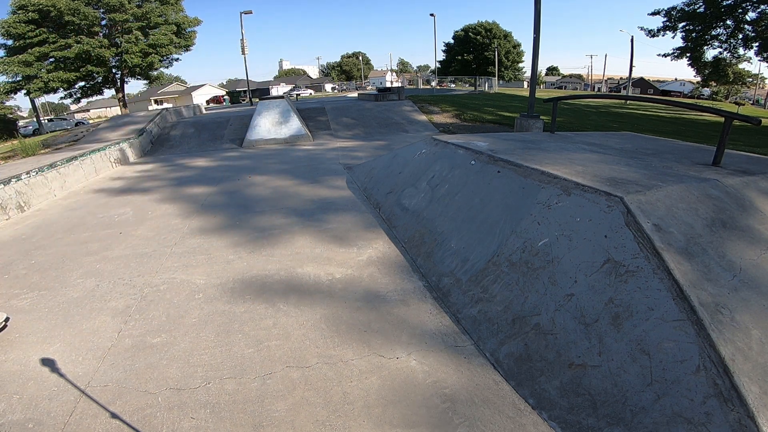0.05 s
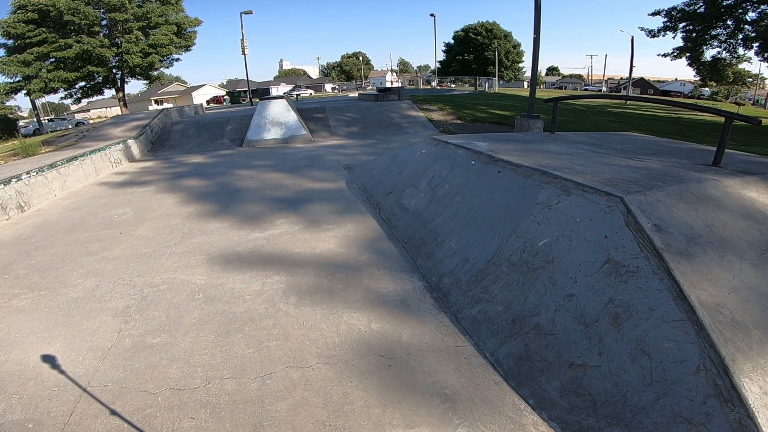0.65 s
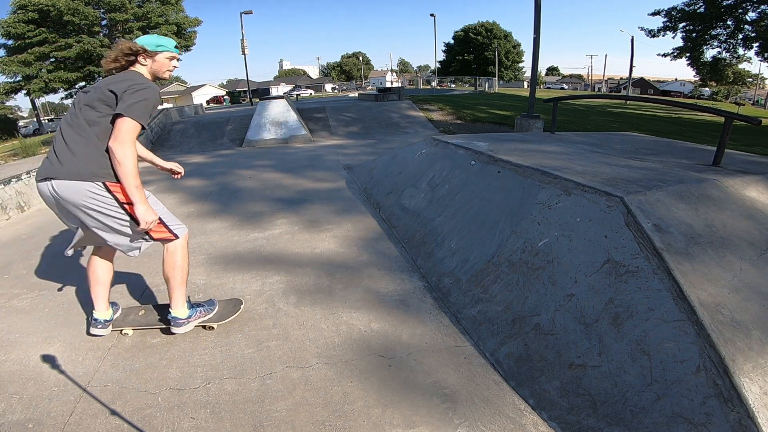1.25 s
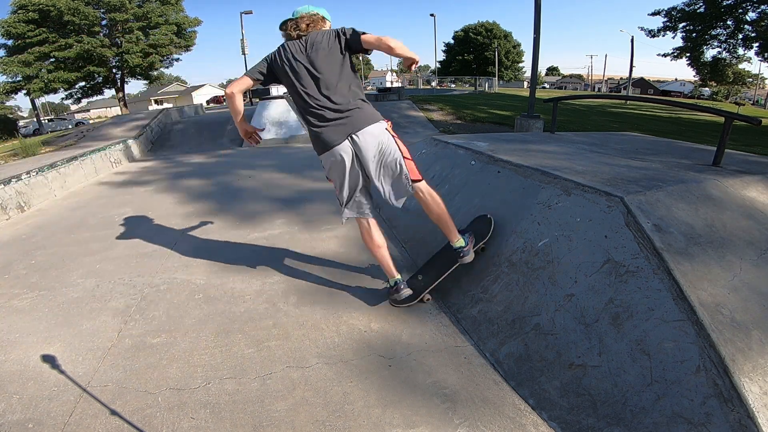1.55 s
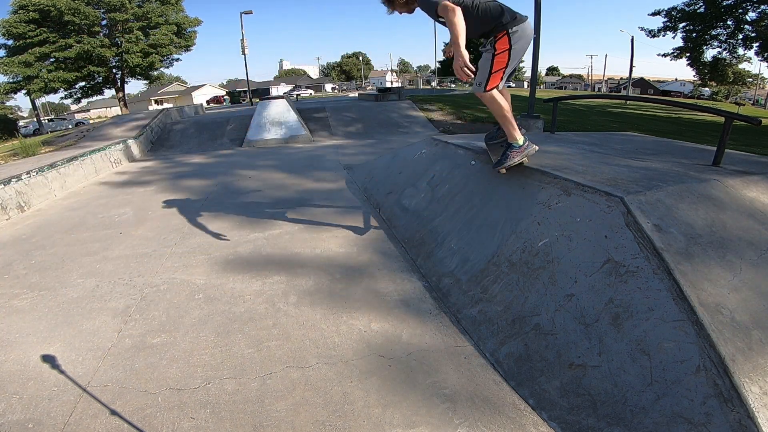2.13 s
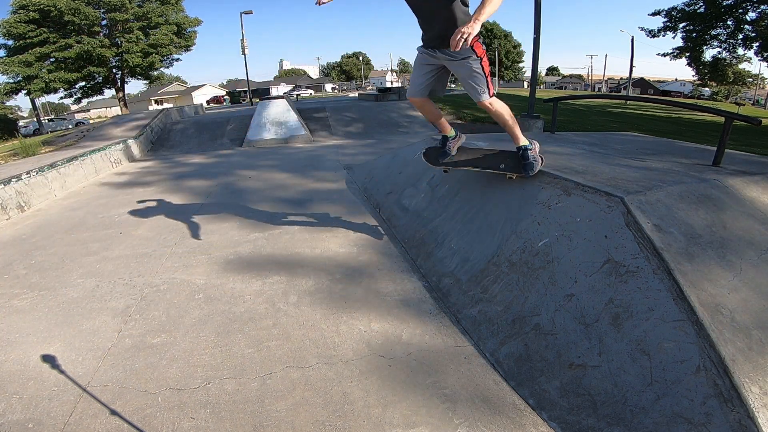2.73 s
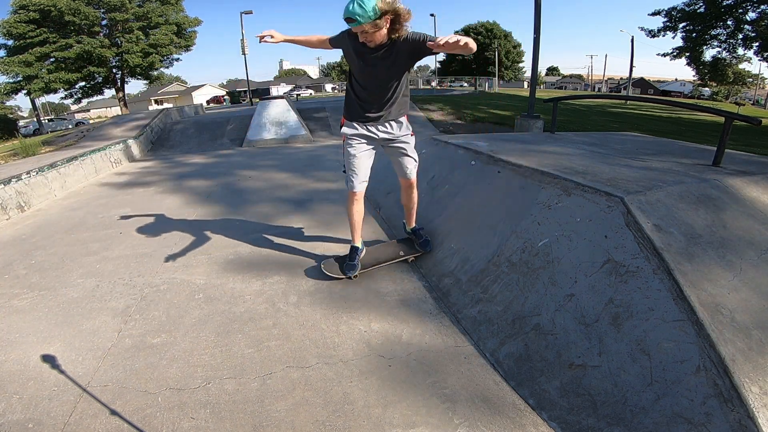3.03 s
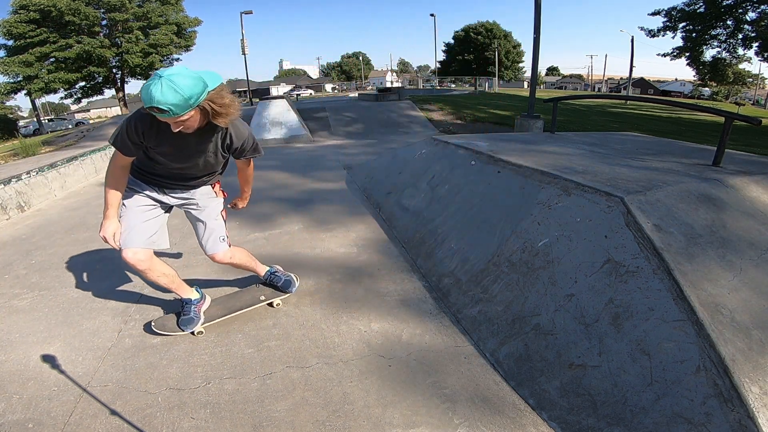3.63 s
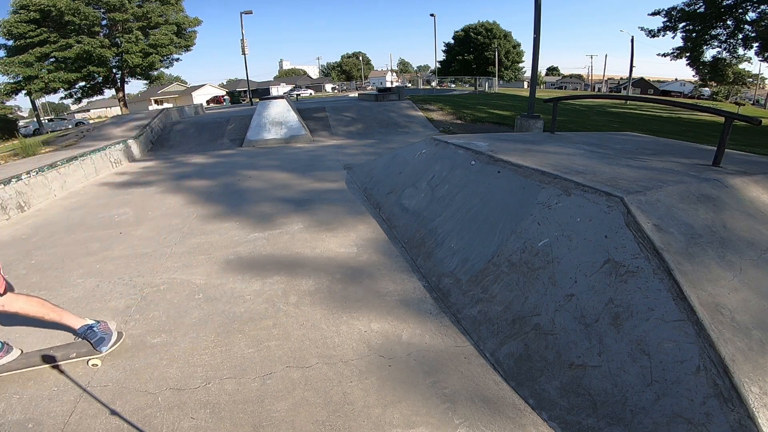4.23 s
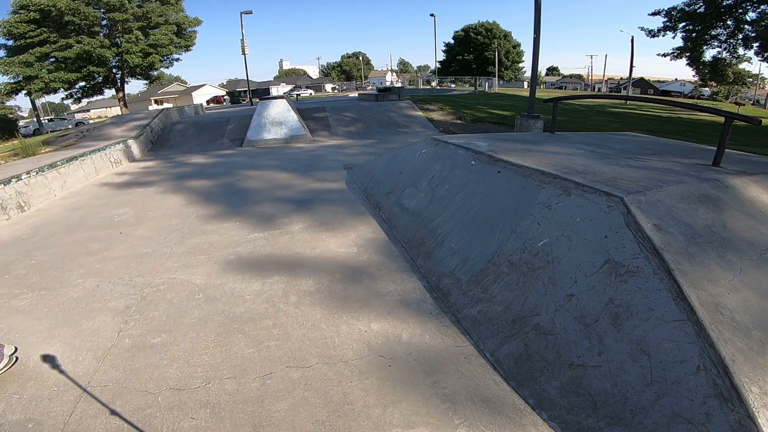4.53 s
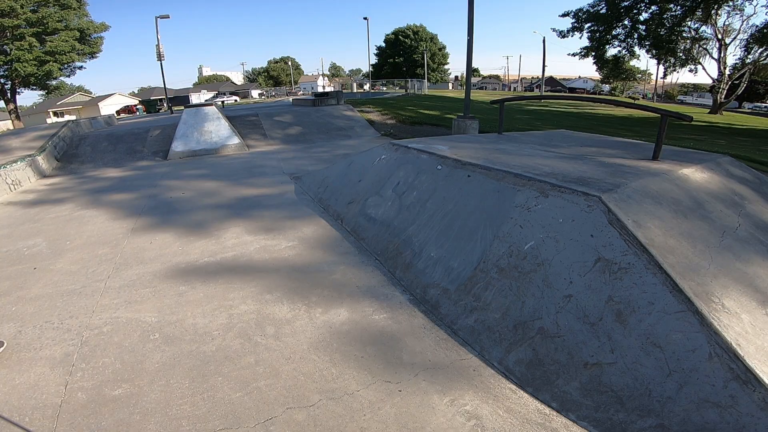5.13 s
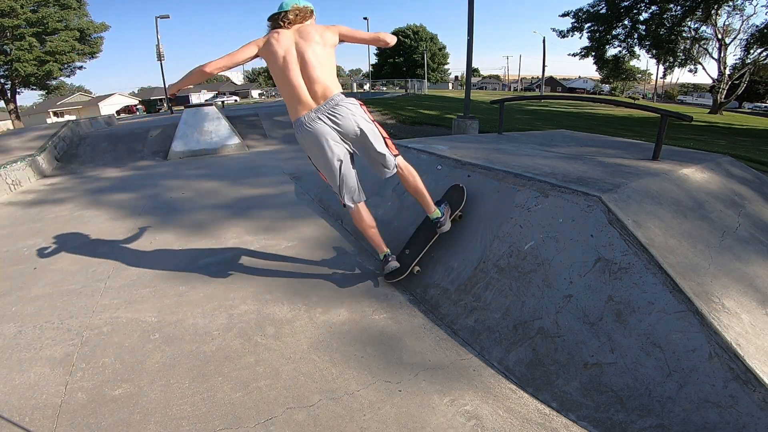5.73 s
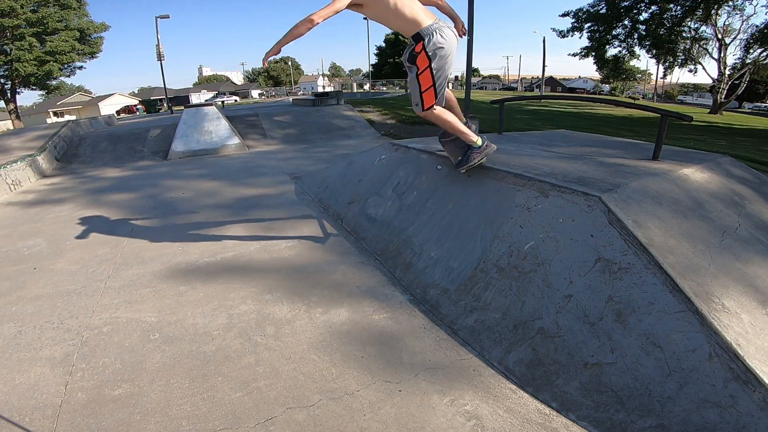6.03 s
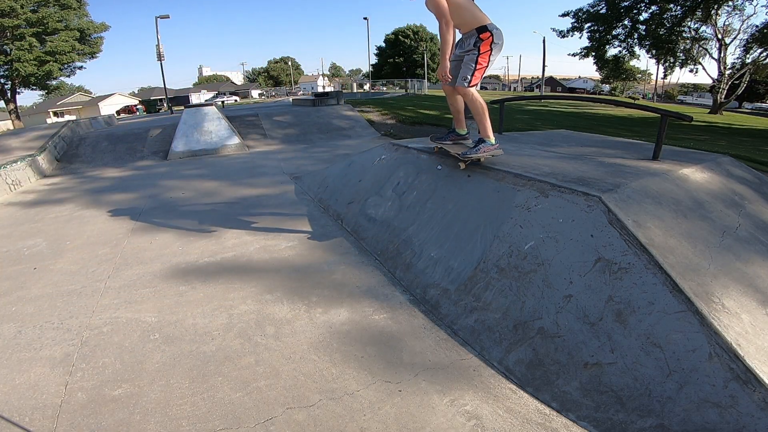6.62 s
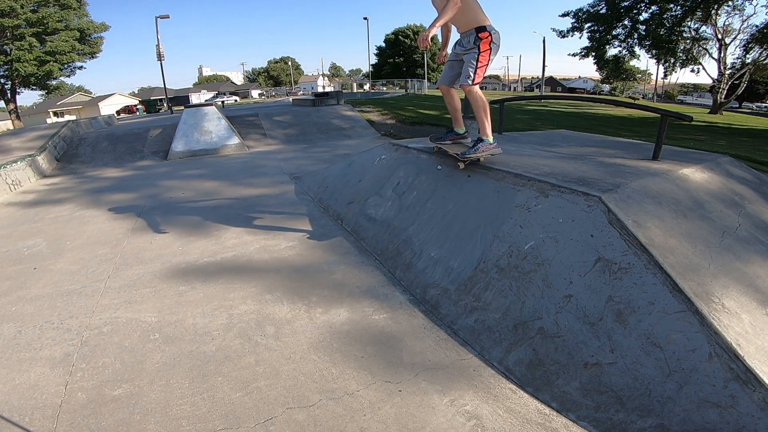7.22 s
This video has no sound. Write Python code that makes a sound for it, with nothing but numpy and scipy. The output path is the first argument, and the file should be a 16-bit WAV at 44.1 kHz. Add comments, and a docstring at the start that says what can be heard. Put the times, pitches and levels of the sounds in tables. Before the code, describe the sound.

A faint puff of wind and a distant hush of town and trees open an outdoor skatepark scene. At 0.4 seconds a skateboard starts rolling close on the left, clattering around 0.7. Its gritty roar grows to loud clacks at 1.6 as it meets a concrete bank. Metal trucks strike the edge at 2 seconds, and the lifted wheels whirr softly until another knock at 2.6. The board comes down with a tiny squeak and sharp clacks near 3.1, then rolls off more quietly to the left. At 5 seconds a short tick comes, low gusts start buffeting the stereo microphone, and a second board rolls in. It cracks loudly against the bank at 5.8, its trucks ring on the edge around 6.2, and the rolling stops by 6.6. The wind keeps rumbling, and a bird chirps once, faintly, at about 7.4 seconds.

```python
"""A puff of wind on the microphones, then skateboard wheels roaring close by in an outdoor concrete park.
Hard wheels rattle over the grit, clack across the joint at the foot of a bank and climb to its edge,
where the metal trucks strike. The first rider stalls there, wheels spinning, and rolls back; the second
stays on top as gusts buffet the small camera's stereo pair. Town and trees hush in the distance,
and a bird chirps once at the end."""
import sys
import numpy as np
from scipy import signal
from scipy.fft import rfft, irfft
from scipy.io import wavfile

SR = 44100
rng = np.random.default_rng(int(sys.argv[2]) if len(sys.argv) > 2 else 0)


def wav_record(signal):
    """Record a signal, one row per channel, as 16-bit PCM in the file named by sys.argv[1]."""
    frames = np.transpose(np.atleast_2d(signal))
    bounded = np.clip(frames, -1, 1)
    # unit amplitude maps onto the largest positive 16-bit level
    quanta = np.round(bounded * 32767).astype(np.int16)
    wavfile.write(sys.argv[1], SR, quanta)


N = 329427
TIME = np.arange(N) / SR
FIRST_RUN_S, SECOND_RUN_S = 0.436, 4.951


def gain_of(db):
    """Decibels to amplitude."""
    return 10 ** (np.asarray(db) / 20)


def unit_rms(x):
    """Scales to rms 1."""
    return x / np.sqrt(np.mean(x ** 2) + 1e-20)


def at_hz(rows, hz, column=1):
    """One column of a table, interpolated over log frequency."""
    table = np.transpose(rows)
    return np.interp(np.log(hz + 1), np.log(table[0] + 1), table[column])


def curves(rows):
    """Each column of a time table, sample by sample."""
    times, *columns = np.transpose(rows)
    return [np.interp(TIME, times, column) for column in columns]


def during(start, end=8, fade=0.00064):
    """A gate that fades in from start and out from end, all in seconds."""
    return np.clip((TIME - start) / fade, 0, 1) * np.clip((end - TIME) / fade + 1, 0, 1)


def swells(rows):
    """Smooth humps in dB from rows of centre_s, half_length_s, height_db."""
    return sum(db * np.exp(-((TIME - s) / half) ** 2) for s, half, db in rows)


def add(mix, start_s, sound):
    """Mixes a sound in at start_s."""
    part = mix[:, max(round(start_s * SR), 0):][:, :sound.shape[-1]]
    part += sound[..., :part.shape[-1]]


def colour(x, spectrum, size=4096):
    """Minimum-phase filter from rows of freq_hz, level_db, falling steeply above the last."""
    hz = abs(np.fft.fftfreq(size, 1 / SR))
    octaves_above = np.log2(np.maximum(hz / spectrum[-1][0], 1))
    db = np.maximum(at_hz(spectrum, hz) - 30 * octaves_above, -110)
    response = np.exp(np.conj(signal.hilbert(np.log(gain_of(db)))))
    taps = np.fft.ifft(response).real[:size // 2] * np.hanning(size)[size // 2:]
    return signal.fftconvolve(x, taps[None], axes=1)[:, :x.shape[1]]


def resonate(x, hz, width_hz):
    """A steady or gliding resonance, applied twice for steep sides; rms 1."""
    carrier = np.exp(2j * np.pi * np.cumsum(np.broadcast_to(hz, N)) / SR)
    pole = np.exp(-np.pi * width_hz / SR)
    baseband = signal.lfilter([(1 - pole) ** 2], [1, -2 * pole, pole ** 2], x / carrier)
    return unit_rms((carrier * baseband).real)


def wander(rate_hz):
    """Smooth random drift of rms 1."""
    lowpass = np.exp(-(np.fft.rfftfreq(N, 1 / SR) / rate_hz) ** 2)
    return unit_rms(irfft(rfft(rng.standard_normal(N)) * lowpass, N))


def noise(spectrum):
    """Two unrelated coloured noises of rms 1."""
    return unit_rms(colour(rng.standard_normal((2, N)), spectrum))


def pan(x, side_db):
    """Leans unrelated noises left by side_db, keeping the level of their mean."""
    left_share = 1 / (1 + gain_of(-2 * side_db))
    return 2 * x * np.sqrt([left_share, 1 - left_share])


# Wind on the microphones (opening puff, two later spells, slow pressure): time_s, level_db
BREEZE_LEVEL = [(0.0, -37), (0.04, -46), (0.434, -40.5), (0.514, -40), (0.6, -45)]
GUST_LEVELS = [
    [(4.96, -20), (5.288, -31), (5.41, -28.5), (5.462, -55), (5.504, -29), (5.866, -18), (5.888, -28.5),
     (5.97, -21.5), (5.996, -37), (6.086, -25.5), (6.114, -44), (6.2, -18), (6.244, -62), (6.29, -22)],
    [(6.3, -31), (6.54, -21), (6.59, -28.5), (6.624, -22.5), (6.648, -34.5), (6.836, -18), (6.942, -22.5),
     (7.062, -19.5), (7.088, -37.5), (7.134, -21), (7.286, -30), (7.31, -22), (7.442, -34.5), (7.47, -33)],
]
RUMBLE_LEVEL = [(0.0, -44.5), (0.37, -51.5), (0.52, -31), (0.58, -46), (0.77, -32.5), (0.81, -49.5),
                (1.72, -41), (1.79, -54), (2.83, -56.5), (2.91, -46), (3.18, -38), (3.39, -73), (3.68, -51),
                (4.89, -63.5), (4.95, -40), (5.28, -46), (7.41, -35.5), (7.47, -28)]
# Spectra of large eddies, small fast eddies and slow pressure: freq_hz, level_db
GUST_SPECTRUM = [(30, -21.5), (60, 6), (85, 8), (140, 4), (200, -9.5), (300, -20.5), (450, -42.5),
                 (700, -64.5), (1500, -70)]
FLUTTER_SPECTRUM = [(100, -12.5), (190, 0.5), (290, -8), (430, -22), (600, -36.5), (1200, -66)]
RUMBLE_SPECTRUM = [(12, -9.5), (28, 2.5), (50, 13), (75, 5), (110, -31), (250, -64)]
# Gusts that hit the ports squarely and shed more small eddies: centre_s, half_length_s, boost_db
SQUARE_GUSTS = [(.15, 0.36, 18.5), (6.47, 0.098, 12), (6.88, 0.16, 18.5)]
# The left port mostly faces the wind: time_s, left_minus_right_db
WIND_SIDE = [(.43, -3), (.5, 6), (4.96, -2), (5.06, 15), (5.55, 5.5), (5.8, 2.5), (6.0, 17)]


def wind():
    """Eddies press right on the microphone ports; stronger gusts shed smaller, brighter ones."""
    wind_db, = curves(np.vstack([BREEZE_LEVEL, *GUST_LEVELS]))
    side_db, = curves(WIND_SIDE)
    flutter_db = -37.5 + 0.56 * wind_db + swells(SQUARE_GUSTS) + 4 * wander(21)
    eddies = noise(GUST_SPECTRUM) * gain_of(wind_db - 2.5 + 1.4 * wander(25))
    eddies += noise(FLUTTER_SPECTRUM) * gain_of(flutter_db)
    gusts = pan(eddies, side_db) * (1 - during(0.6, SECOND_RUN_S))
    rumble = noise(RUMBLE_SPECTRUM) * gain_of(curves(RUMBLE_LEVEL)[0] + 5.5)
    return gusts + pan(rumble, 0.61 * side_db * during(SECOND_RUN_S))


# Town and trees far beyond the park, and insects: freq_hz, level_db
HUSH_SPECTRUM = [(100, 0.5), (400, 4.5), (540, -1), (700, 3.5), (1000, -2), (1500, -2), (2200, -10.5),
                 (3200, -18), (4500, -17), (6300, -17), (8000, -24.5), (12000, -27), (14500, -39)]
INSECT_SPECTRUM = [(3000, -39), (4300, 9), (5200, 7), (6100, -3), (7500, -29)]


def background():
    """The slowly swelling hush of distant town and trees, with a faint insect hiss at first."""
    hush = noise(HUSH_SPECTRUM) * gain_of(0.9 * wander(4.3))
    insects = noise(INSECT_SPECTRUM) * (1 - during(FIRST_RUN_S))
    return gain_of(-61) * (hush + 0.021 * hush[::-1]) + gain_of(-73) * insects


def contact(t, t60, spectrum, snap):
    """One sharp snap (its share of the energy), then a noise burst that dies like crushed grit."""
    burst = rng.standard_normal((2, len(t))) * gain_of(-60 * t / t60)
    burst *= np.sqrt((1 - snap) / np.sum(burst ** 2, 1, keepdims=True))
    burst[0, np.argmax(t > 0.0003)] += np.sqrt(snap)
    burst = colour(burst, spectrum)
    decay_energy = SR * t60 / (2 * np.log(1000))
    return burst * np.sqrt(decay_energy / np.sum(burst[0] ** 2))


# A dull tick, alike in both channels: freq_hz, level_db
TICK_SPECTRUM = [(100, 3), (600, -0.5), (4000, -22.5), (16000, -30)]


def ticks():
    """A short tick is heard as each run starts."""
    out, t = np.zeros((2, N)), np.arange(SR // 20) / SR
    for start_s, level_db in [(FIRST_RUN_S, -31), (SECOND_RUN_S, -21)]:
        add(out, start_s, gain_of(level_db) * contact(t, 0.0084, TICK_SPECTRUM, snap=0.34)[0])
    return out


def grit(per_s, spread_db, patchy_db):
    """Tiny random collisions of uneven size, louder on rough patches."""
    size = gain_of(spread_db * np.minimum(rng.exponential(1, (2, N)), 4))
    clicks = size * rng.choice([-1, 1], (2, N)) * (rng.random((2, N)) < per_s / SR)
    return clicks * gain_of(patchy_db * wander(45))


# Fine grit under the wheels, heard close: freq_hz, level_db
FIZZ_SPECTRUM = [(2000, -38.5), (4000, -6), (5200, 0.5), (6500, 2.5), (7500, -6), (8600, -13), (10100, -12),
                 (12000, -22), (14500, -21), (15800, -44)]
# Its brightest hiss, growing as the wheels turn towards the microphones: time_s, centre_hz, facing_db
HISS_PATH = [(.44, 6260, 3), (.6, 6200, 0.5), (.8, 6000, 1.5), (1.1, 6040, 2.5), (1.5, 5170, 3),
             (1.8, 6060, 0.5), (2.05, 5640, -0.5), (2.92, 5900, 3.5), (3.03, 5300, 3), (3.7, 5800, 8),
             (4.0, 6950, 7), (4.3, 7300, 4.5), (4.6, 6500, 3), (4.9, 5800, -2.5), (5.7, 5550, 0),
             (6.15, 5960, -3)]


def grit_fizz(road, pebbles, roar_db):
    """Fine grit hisses and coarse grains pop, swelling a little more steeply than the roar."""
    centre_hz, facing_db = curves(HISS_PATH)
    fizz_db = roar_db - 15 + 0.124 * (roar_db - roar_db.mean()) + facing_db
    sand = unit_rms(grit(per_s=3200, spread_db=-4, patchy_db=4.5))
    hiss = gain_of(-5.5) * resonate(sand + gain_of(-3.5) * pebbles, centre_hz, width_hz=1400)
    return gain_of(fizz_db) * (unit_rms(colour(road, FIZZ_SPECTRUM)) + hiss)


# The deck's drone, and its lower hum as it flexes under load: freq_hz, level_db
DRONE_SPECTRUM = [(60, -20.5), (200, -6), (340, 0.5), (480, -8.5), (660, -12.5), (800, -15), (1200, -30.5),
                  (3000, -66.5)]
HUM_SPECTRUM = [(50, -21.5), (110, -16), (165, -3), (240, -5), (330, -8), (700, -44.5)]


def deck_drone(bumps, drone_db):
    """Bumps travel up through the trucks and shake the deck."""
    drone = gain_of(drone_db + 3) * unit_rms(colour(bumps, DRONE_SPECTRUM))
    hum = gain_of(0.64 * drone_db - 12.5) * unit_rms(colour(bumps, HUM_SPECTRUM))
    return drone + hum


def gap_echo(x, delay_s, strength):
    """One reflection under the deck, its path changing: a moving comb of peaks and dips."""
    late = np.array([np.interp(TIME - delay_s, TIME, row) for row in x])
    return (x + strength * late) / np.sqrt(1 + strength ** 2)


# Wheels as speed and distance change, a list a pass (up, back down, second rider): time_s, level_db
PASS_LEVELS = [
    [(0.44, -53), (0.62, -51), (0.72, -47.5), (1.0, -45), (1.33, -42.5), (1.56, -30.5), (1.61, -43.5),
     (1.73, -42), (1.95, -49.5), (2.15, -60)],
    [(2.52, -63.5), (2.66, -56.5), (2.8, -65), (2.93, -46.5), (3.06, -35.5), (3.3, -57.5), (4.1, -54),
     (4.93, -54)],
    [(4.97, -46), (5.1, -47.5), (5.45, -43), (5.76, -33), (5.81, -40), (5.91, -40), (5.98, -43.5),
     (6.15, -51.5), (6.3, -50.5), (6.4, -62.5)],
]
# Hard wheels on concrete: freq_hz, level_db
ROAR_SPECTRUM = [(300, -28.5), (700, 2), (950, 4), (1080, 2), (1380, 1), (1800, -3), (2300, -4.5),
                 (2800, -12), (3400, -11.5), (3950, -18.5), (4600, -26), (6000, -24.5), (9000, -39)]
# Hollow note between deck and ground: time_s, pitch_hz, above_drone_db, echo_strength
GAP_NOTE = [(.44, 495, 5.5, 0), (1.3, 426, -13, .15), (1.45, 556, 6.5, 0), (1.55, 616, 0.5, 0.2),
            (1.85, 810, -23, 0.03), (2.9, 1005, -27, 0.23), (3.04, 590, 0.5, 0), (3.25, 720, 0, 0),
            (3.6, 700, -2, 0), (4.0, 664, 1.5, 0), (4.3, 635, 4, 0.1), (4.9, 590, -8.5, 0),
            (5.35, 455, -8.5, 0.02), (5.7, 634, 3.5, 0.13), (6.1, 730, -13, 0)]
# The drone swells passing the camera, sinks when unweighted: centre_s, half_length_s, change_db
DRONE_SWELLS = [(1.3, 0.61, 6), (3.01, 0.1, -0.5), (4.2, 0.51, 6.5), (5.6, 0.55, 1.5)]
# High on the bank the deck drones less and its underside shows the trucks' ring: start_s, end_s
BANK_SPANS = [(1.68, 2.73), (5.9, 8)]


def rolling():
    """Grit shakes the wheels and, through the trucks, the deck and the air beneath it."""
    hop_s = 0.022  # after a clack the wheels skip and the roar dips
    hops = [(s + hop_s, 0.61 * hop_s, -5 * gain_of(crack_db)) for s, crack_db, *_ in SLAB_HITS]
    slab_db = 0.66 * wander(14)  # rougher and smoother stretches of concrete
    roar_db = curves(np.vstack(PASS_LEVELS))[0] + swells(hops) + slab_db
    on_bank = sum(during(start, end, fade=0.066) for start, end in BANK_SPANS)
    drone_db = roar_db - 1.5 + swells(DRONE_SWELLS) - 6.5 * on_bank
    drone_db = 10 * np.log10(gain_of(drone_db) ** 2 + deck_shudder())
    gap_hz, gap_db, echo_strength = curves(GAP_NOTE)
    road = grit(per_s=7000, spread_db=2.5, patchy_db=1.6)
    bumps = grit(per_s=3500, spread_db=2.5, patchy_db=3.5)
    pebbles = unit_rms(grit(per_s=110, spread_db=2.2, patchy_db=2.5))
    tread = unit_rms(colour(unit_rms(road) + gain_of(-11) * pebbles, ROAR_SPECTRUM))
    roar = gain_of(roar_db + 1.4) * gap_echo(tread, 1 / gap_hz, echo_strength)
    wheels = (roar + grit_fizz(road, pebbles, roar_db)) * gain_of(-2.5 * on_bank)
    gap = gain_of(drone_db + gap_db) * resonate(road, gap_hz * (1 + 0.023 * wander(29)), width_hz=330)
    trucks = gain_of(roar_db - 7.5) * on_bank * resonate(road, hz=1380, width_hz=440)
    moving = during(FIRST_RUN_S) * during(0, 6.46, fade=0.2)
    return (wheels + deck_drone(bumps, drone_db) + gap + trucks) * moving


def spot_boost(hz, spot_hz, db, octaves):
    """The spot struck favours frequencies near its own pitch: their lift in dB."""
    return db * np.exp(-(np.log2(hz / spot_hz) / octaves) ** 2)


# Wheels and tail striking the slab near the camera:
# start_s, crack_db, grit_db, knock_db, thump_db, spot_hz
SLAB_HITS = [(0.639, -11.5, -35, -18, -11, 1070), (0.6422, -11, -49, -13.5, -44, 1130),
             (0.661, -26, -44, -30, -27, 2200), (0.6775, -18.5, -46, -20, -9, 3000),
             (0.6947, -13.5, -50, -19, -15.5, 1060), (0.698, -8.5, -30, -17.5, -9, 3540),
             (0.7096, -19, -49, -18, -11.5, 1050), (0.729, -32.5, -48, -26, -27, 2200),
             (0.7512, -30.5, -60, -26, -22, 1400), (0.944, -40, -66, -49, -27, 1400),
             (1.02, -30.5, -58, -25.5, -28, 1240), (1.1838, -24.5, -58, -18, -25, 1040),
             (1.3114, -32, -44, -26, -37, 700), (1.5659, -14, -29, -14.5, -35, 820),
             (1.5725, 0, -17.5, -9.5, -6.5, 2230), (1.5962, -14.5, -32, -10, -6.5, 340),
             (1.6198, -9, -28, -32, -44, 1800), (1.636, -25.5, -39, -30, -27, 3600),
             (1.647, -8.5, -26.5, -6, -8, 2480), (1.655, -15, -34, -15, -11.5, 505),
             (1.717, -34, -61, -23, -19.5, 970), (2.041, -38, -68, -39, -29.5, 93),
             (2.9664, -22, -36, -19, -19.5, 980), (3.0742, -4, -21, -15, -14, 880),
             (3.0766, -1.5, -37, -15, -5, 880), (3.0946, -18, -29.5, -28, -14, 700),
             (3.104, -14, -34, -14, -9, 614), (3.114, -14, -34, -16.5, -12, 620),
             (3.143, -29, -56, -29, -25, 1500), (3.168, -31.5, -66, -33, -25, 600),
             (3.179, -35.5, -64, -31.5, -29, 610), (3.2143, -20, -40, -25, -23, 1180),
             (3.3679, -22, -46.5, -44, -35.5, 1400), (4.024, -44, -54, -38, -24.5, 800),
             (4.3207, -53, -63, -44, -24.5, 840), (5.3787, -19, -44, -16.5, -18, 940),
             (5.504, -33, -42.5, -23.5, -28, 433), (5.7695, 0.5, -23.5, -8.5, -20, 2205),
             (5.79, -12.5, -32, -8, -13, 900), (5.825, -5, -24.5, -23, -14, 3500),
             (5.8495, -9.5, -28.5, -10, -7.5, 780), (5.854, -13, -27, -18, -9, 1200)]
# The dry crack at the wheel: freq_hz, level_db
CRACK_SPECTRUM = [(300, -16.5), (650, 1), (900, 6), (1100, -5), (1420, -0.5), (1750, -2), (2250, 1),
                  (2850, -5), (3500, -9), (4400, -19.5), (6000, -14), (10000, -44.5)]


def clacks():
    """Each blow cracks at the wheel, crushes grit and sets the deck ringing."""
    out, t = np.zeros((2, N)), np.arange(SR // 4) / SR
    for s, crack_db, grit_db, knock_db, thump_db, spot_hz in SLAB_HITS:
        force_db = crack_db + 15  # relative to a medium blow
        left_db = max(np.interp(s, *np.transpose(BOARD_SIDE)), 0)
        t60 = 0.027 * np.exp(-0.0124 * left_db - 0.0276 * force_db)  # shorter if harder or further left
        spectrum = [(hz, db + spot_boost(hz, spot_hz, db=12.5, octaves=0.23))
                    for hz, db in CRACK_SPECTRUM]
        add(out, s, gain_of(crack_db - 8.5) * contact(t, t60, spectrum, snap=0.056))
        add(out, s, gain_of(grit_db) * contact(t, 0.69 * t60, FIZZ_SPECTRUM, snap=0.12))
        add(out, s + 0.0005, deck_ring(t, thump_db, knock_db, crack_db - 15, spot_hz))
    return out


def sum_modes(waves):
    """Two mixes of the modes: one with alternating signs, one with random signs."""
    count = len(waves)
    return np.array([(-1) ** np.arange(count), rng.choice([-1, 1], count)]) @ waves


# Deck, trucks and wheels ringing, from slow bending to the bright clack: pitch_hz, level_db, t60_s
DECK_MODES = [(88, -7, 0.066), (143, -1.5, 0.067), (174, -1, 0.053), (233.4, -4, 0.054), (292, -9.5, 0.045),
              (466, -3.5, 0.041), (519, -5, .037), (646, -6.5, 0.042), (890, -1.5, 0.015), (1076, -6, .06),
              (1419, 0, .035), (1830, -12.5, 0.02), (2273, -2, 0.015), (3574, 4.5, 0.0051), (6100, -6, .01)]


def deck_ring(t, thump_db, knock_db, tap_db, spot_hz):
    """A heavy landing drives the deck's low modes, a hard tap the high ones."""
    hz, db, t60 = np.transpose(DECK_MODES)[:, :, None]
    drive_db = np.select([hz < 370, hz < 790], [thump_db, knock_db], tap_db)
    drive_db = drive_db + spot_boost(hz, spot_hz, db=7, octaves=0.46)
    hz = hz * (1 + 0.048 * rng.uniform(-1.48, 1, hz.shape))  # the rider's weight shifts each mode
    return sum_modes(gain_of(drive_db + db - 60 * t / t60) * np.sin(2 * np.pi * hz * t))


def deck_shudder(t60=0.12):
    """Power of the chatter that each clack leaves in the deck."""
    power, t = np.zeros((1, N)), np.arange(SR // 2) / SR
    for start_s, *_, thump_db, _ in SLAB_HITS:
        add(power, start_s, gain_of(thump_db - 29.5 - 60 * t / t60) ** 2)
    return power[0]


# Lifted wheels spinning while the first rider stalls on the edge: time_s, level_db
WHIRR_LEVEL = [(1.9, -56), (2.05, -46.5), (2.15, -54), (2.3, -49.5), (2.48, -48.5), (2.56, -53.5),
               (2.62, -94)]
# Hiss of their bearings: freq_hz, level_db
BEARING_SPECTRUM = [(700, -48), (1100, -29), (1300, -8), (1550, 3), (1850, 12.5), (2100, -1), (2400, 3.5),
                    (3200, -15), (6000, -34)]
# A truck ringing with its wheels: pitch_hz, level_db, t60_s
TRUCK_MODES = [(698, -16.5, 0.074), (1302, 0, 0.027), (1520, -5, 0.038), (1740, -5, 0.019),
               (2073, -10.5, 0.026), (2780, -19, 0.038)]


def bearing_whirr(best_drive_hz=1300, spin_hz=29):
    """Bearing balls rattle in the free wheels and keep the truck ringing; each turn swells the sound."""
    balls = grit(per_s=6800, spread_db=4, patchy_db=1)
    drift = 1 + 0.012 * wander(3.9)
    ringing = np.zeros((2, N))
    for hz, db, t60 in TRUCK_MODES:
        octaves_off = abs(np.log2(hz / best_drive_hz))
        ringing += gain_of(db - 6 * octaves_off) * resonate(balls, hz * drift, width_hz=5 / t60)
    hiss = gain_of(-4.5) * unit_rms(colour(balls, BEARING_SPECTRUM))
    level_db = curves(WHIRR_LEVEL)[0] + np.sin(2 * np.pi * spin_hz * TIME)
    spinning = during(WHIRR_LEVEL[0][0], WHIRR_LEVEL[-1][0])
    return (gain_of(-1) * ringing + hiss) * gain_of(level_db) * spinning


def truck_ring(t, spot_hz):
    """The truck's modes after one blow, each slightly detuned."""
    hz, db, t60 = np.transpose(TRUCK_MODES)[:, :, None]
    db = db + spot_boost(hz, spot_hz, db=8, octaves=0.28)
    hz = hz * (1 + 0.025 * rng.uniform(-0.79, 1, hz.shape))
    attack = 1 - np.exp(-t / 0.00039)
    return sum_modes(gain_of(db - 60 * t / t60) * np.sin(2 * np.pi * hz * t) * attack)


# Trucks hitting the top edge of the bank: start_s, ring_db, clack_db, scrape_t60_s, spot_hz
TRUCK_HITS = [(1.901, -33, -31.5, 0.064, 1500), (1.999, -18, -21.5, 0.043, 1710),
              (2.013, -19, -24, 0.02, 2100), (2.027, -11.5, -33, 0.03, 1450),
              (2.038, -22, -31, 0.022, 1700), (2.559, -14, -18, .019, 720), (2.59, -34, -52, .018, 1710),
              (2.622, -39, -34, .029, 1300), (2.642, -26, -51, 0.03, 1410), (2.662, -26, -50, 0.022, 1520),
              (2.675, -21, -50, 0.023, 1320), (6.15, -18.5, -43, .05, 2100),
              (6.163, -8.5, -18.5, 0.076, 1600), (6.186, -16, -15, 0.02, 1300),
              (6.206, -11, -18.5, 0.1, 1600), (6.219, -16, -37, 0.066, 1490),
              (6.299, -15.5, -18, 0.02, 2000), (6.612, -41.5, -41, 0.027, 705),
              (7.337, -44, -51, 0.041, 1310)]
# Metal scraping concrete: freq_hz, level_db
SCRAPE_SPECTRUM = [(150, -3), (450, -9), (760, -4), (1000, -4.5), (1330, -1), (1650, 0), (2150, -5),
                   (2600, -19.5), (3600, -22.5), (5000, -45.5), (10000, -82.5)]


def truck_hits():
    """Metal hangers strike the concrete edge: a ring, a scrape, a dry clack and a scratch of grit."""
    out, t = np.zeros((2, N)), np.arange(SR // 4) / SR
    for s, ring_db, clack_db, t60, spot_hz in TRUCK_HITS:
        add(out, s, gain_of(ring_db - 12.5) * truck_ring(t, spot_hz))
        add(out, s, gain_of(ring_db - 9.5) * contact(t, t60, SCRAPE_SPECTRUM, snap=0.04))
        add(out, s, gain_of(clack_db - 8.5) * contact(t, 0.63 * t60, CRACK_SPECTRUM, snap=0.071))
        add(out, s, gain_of(0.94 * ring_db - 39) * contact(t, 1.6 * t60, FIZZ_SPECTRUM, snap=0.1))
    return out


# One squeak on the way down the bank: time_s, level_db
SQUEAK_LEVEL = [(2.995, -57.5), (2.997, -40), (3.003, -37), (3.016, -53), (3.06, -51), (3.08, -70)]


def wheel_squeak():
    """A wheel scuffs sideways for an instant."""
    slips = resonate(rng.standard_normal((2, N)), hz=2950, width_hz=650)
    return slips * gain_of(curves(SQUEAK_LEVEL)[0]) * during(2.99, 3.8)


# A bird off in the trees: time_s, pitch_hz, level_db
CHIRP = [(7.359, 2900, -72), (7.366, 3630, -59.5), (7.373, 4470, -59), (7.383, 4430, -49.5),
         (7.396, 3720, -53.5), (7.412, 3560, -64), (7.435, 3150, -65), (7.47, 2950, -75)]


def bird():
    """One arched chirp, roughening as it falls, with a short wash of echoes."""
    hz, db = curves(CHIRP)
    roughness = 0.01 + 0.035 * during(7.385, fade=0.017)
    phase = 2 * np.pi * np.cumsum(hz * (1 + roughness * wander(300))) / SR
    chirp = gain_of(db) * np.sin(phase) * during(7.359)
    centred = np.array([chirp, chirp])
    return centred + gain_of(-6.5) * park_echoes(centred, t60=0.18)


# What the ramps and trees send back: freq_hz, level_db
ECHO_SPECTRUM = [(100, 9), (1500, -8.5), (5000, -1.5), (12000, -14.5)]


def park_echoes(x, t60, per_s=2500):
    """Sparse, dull reflections, starting 6 ms after the direct sound."""
    t = np.arange(SR // 2) / SR
    taps = rng.standard_normal((2, len(t))) * (rng.random((2, len(t))) < per_s / SR) * (t > 0.006)
    tail = colour(taps * gain_of(-60 * t / t60), ECHO_SPECTRUM)
    return signal.fftconvolve(x, tail / np.linalg.norm(tail[0]), axes=1)[:, :N]


# The camera's microphone pair: freq_hz, likeness, left_minus_right_db, left_lead_rad, shadow_share
MIC_PORTS = [(60, 0.73, -9.5, 0, 0.25), (165, 1, 0.5, -0.5, .2), (603, 0.79, 2.5, 0.1, 0.13),
             (1700, 0.86, 1.5, 0.11, 1), (3860, 1, 2, 0.5, 0.9), (6780, 0.3, 8.5, -1.5, 0.25),
             (9700, 0, -5, 0.91, 0.69)]
# Side of the camera the board is on: time_s, left_minus_right_db
BOARD_SIDE = [(0.44, 8), (1.1, 8), (1.55, -3), (1.8, -5.5), (2.6, -5), (3.1, -1), (4.9, 7), (5.25, 8.5),
              (5.76, -2), (6.1, -4)]


def microphones(x):
    """Row 0 reaches both ports, row 1 sets them apart; the camera body shades the far port."""
    hz, frame_s, (shared, apart) = signal.stft(x, SR, nperseg=256, noverlap=192)
    likeness, balance_db, lead_rad, shadow = (at_hz(MIC_PORTS, hz, k)[:, None] for k in range(1, 5))
    side_db = np.interp(frame_s, TIME, curves(BOARD_SIDE)[0])
    likeness = np.clip(likeness * (1 - 0.041 * np.maximum(side_db, 0)), 0, 1)  # lower off to the left
    apart = apart * np.sqrt((1 - likeness) / (1 + likeness))
    lean = gain_of((balance_db + shadow * side_db) / 2) * np.exp(0.5j * lead_rad)
    ports = np.array([(shared + apart) * lean, (shared - apart) / lean])
    ports *= 2 / (abs(lean) + 1 / abs(lean))
    return signal.istft(ports, SR, nperseg=256, noverlap=192)[1][:, :N]


# The second rider's board sounds harder, with less of the middle: freq_hz, gain_db
SECOND_BOARD_TONE = [(200, -1), (450, 4), (750, -1), (1100, -2), (1500, 0.5), (2300, 1), (3200, 0),
                     (4400, 2.5), (7000, 2.5), (18000, 0.5)]


def scene():
    """Two boards in turn, close to the camera in the open park, over wind and distant hush."""
    board = rolling() + clacks() + truck_hits() + bearing_whirr() + wheel_squeak()
    second = during(SECOND_RUN_S)
    direct = microphones(board * (1 - second) + colour(board * second, SECOND_BOARD_TONE))
    echoes = gain_of(-17.5) * park_echoes(direct, t60=0.11)
    return direct + echoes + wind() + background() + gain_of(-2.5) * bird() + ticks()


def record(dry):
    """Mono until the first run, then stereo; peaks clip, both ends fade and the top is cut."""
    mid = dry.mean(0)
    ports = np.clip(mid + (dry - mid) * during(FIRST_RUN_S), -0.97, 0.97)
    ports *= during(0, TIME[-1] - 0.004, fade=0.004)
    lowpass = signal.firwin(255, cutoff=16200, window=("kaiser", 9), fs=SR)
    return signal.oaconvolve(ports, lowpass[None], "same")


dry = scene()
out = record(dry)
wav_record(out)
```